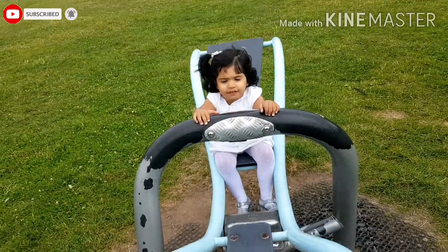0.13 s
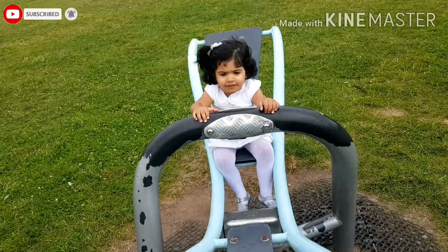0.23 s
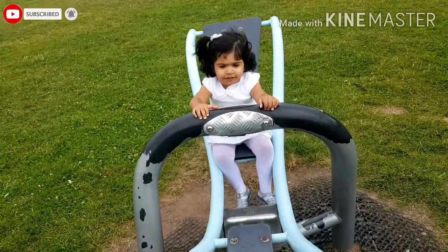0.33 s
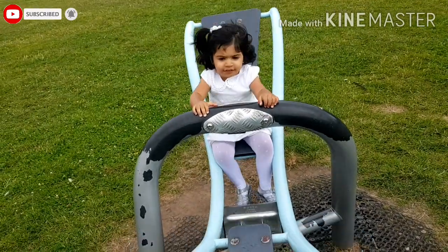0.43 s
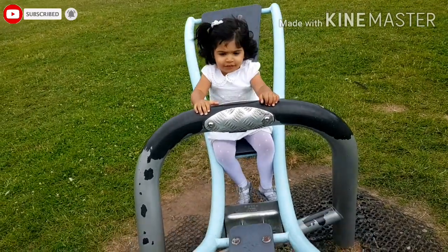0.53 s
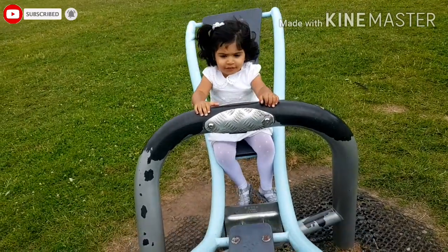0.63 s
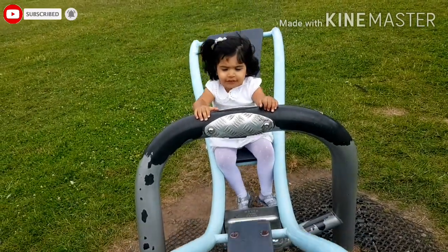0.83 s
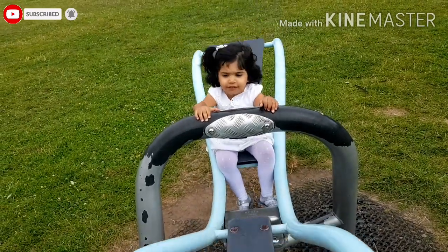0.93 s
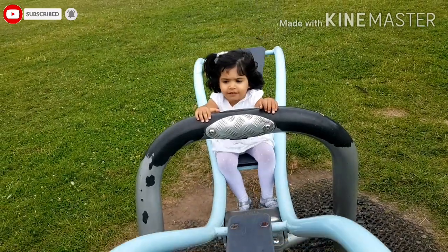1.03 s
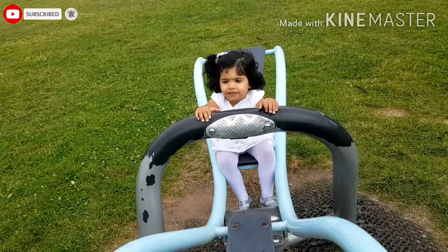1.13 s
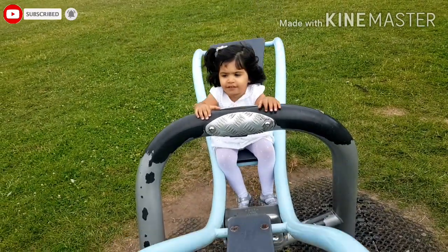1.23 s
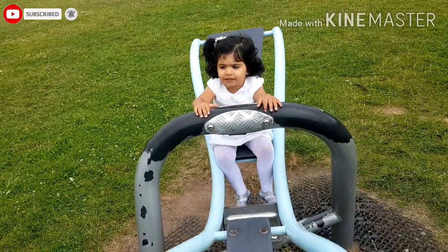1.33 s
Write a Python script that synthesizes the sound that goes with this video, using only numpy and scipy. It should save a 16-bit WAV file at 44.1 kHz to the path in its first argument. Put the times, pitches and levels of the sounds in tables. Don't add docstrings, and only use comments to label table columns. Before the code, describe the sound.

A dry metal pivot squeaks sharply, then rasps back more roughly, over soft outdoor wind buffeting

```python
import sys
import numpy as np
from scipy import signal
from scipy.fft import rfft, irfft
from scipy.io import wavfile
from scipy.ndimage import uniform_filter1d

SR = 44100
rng = np.random.default_rng(int(sys.argv[2]) if len(sys.argv) > 2 else 0)


def inscribe(sig):
    pcm = np.round(np.clip(np.atleast_2d(sig).T, -1, 1) * 32767)
    wavfile.write(sys.argv[1], SR, pcm.astype(np.int16))


def to_linear_factor(level_db):
    exponent = np.asarray(level_db, float) / 20
    return 10 ** exponent


N = 61740
TOP_HZ = 15450


def curve(t, rows, col=1, off=-130.):
    r = np.array(rows)
    if off:
        return np.interp(t, r[:, 0], r[:, col], off, off)
    return np.interp(t, r[:, 0], r[:, col])


def on_log(hz, rows, col=1):
    r = np.array(rows)
    return np.interp(np.log(np.maximum(hz, 1)), np.log(r[:, 0]), r[:, col])


def unit(x):
    return x / np.sqrt(np.mean(x ** 2))


def colour(x, rows):
    hz = np.arange(N // 2 + 1) * SR / N
    return irfft(rfft(x) * to_linear_factor(on_log(hz, rows)), N)


def walk(rate):
    k = int(SR / rate)
    held = np.repeat(rng.standard_normal(N // k + 1), k)
    return 1.3 * uniform_filter1d(uniform_filter1d(held, k), k)[:N]


def mode(x, hz, width):
    return signal.lfilter(*signal.iirpeak(hz, hz / width, SR), x)


# (f/Hz, left lead/rad, left minus right level/dB)
PORTS = [(1302, 0.47, 1.6), (2450, 0.6, 1.5), (3750, 1.33, -1.5), (4016, 1.3, 4), (4800, -0.56, -8.5),
         (6300, -1.3, -0.5), (12000, 1.3, -4.5)]


def squeal(hz, gain):
    wobble_hz = 18
    out, on = np.zeros((2, N)), gain > 1e-6
    side = np.array([[.5], [-.5]])
    phase = (2 * np.pi * np.cumsum(hz + wobble_hz * walk(120)) / SR)[on]
    lag = side * on_log(hz[on], PORTS)
    size = np.sqrt(2) * gain[on] * to_linear_factor(side * on_log(hz[on], PORTS, col=2))
    overtone = to_linear_factor(-31) * (hz.max() < TOP_HZ / 3)
    wave = np.sin(phase + lag)
    for k in (2, 3):
        wave = wave + overtone * np.sin(k * phase + lag)
    out[:, on] = size * wave
    return out


# (t/s, f/Hz, level/dB)
LEAD = [
    [(0.218, 3984, -64), (0.232, 3786, -48.5), (0.25, 3881, -34.5), (0.318, 3801, -27.5),
     (0.329, 3797, -32)],
    [(0.329, 3944, -30), (0.339, 3870, -40.5), (0.349, 3810, -31.5), (0.375, 3884, -38.5),
     (0.381, 3814, -41.5), (0.391, 3785, -41.5), (0.397, 3925, -50.5), (0.4, 4013, -41)],
    [(0.393, 3834, -49.5), (0.397, 4010, -53), (0.403, 4028, -33), (0.421, 4068, -26.5),
     (0.449, 3998, -32.5), (0.479, 4133, -51.5), (0.5, 4200, -76)],
    [(0.925, 3802, -58.5), (0.939, 4093, -36.5), (0.955, 4039, -29.5), (0.965, 4070, -34),
     (0.973, 4200, -55.5), (1.0, 4220, -72.5)],
]


def leading_squeal(t):
    out = 0
    for rows in LEAD:
        gain = uniform_filter1d(to_linear_factor(curve(t, rows, col=2)), size=150)
        out = out + squeal(curve(t, rows, off=0), gain * to_linear_factor(.6 * walk(130)))
    return out


SPELLS_OUT = [(.219, .045, 2540, -55), (.228, .025, 4850, -52), (.265, .065, 2330, -51),
              (.272, .02, 1615, -52), (.235, .095, 1440, -58), (.222, .045, 6230, -55),
              (.268, .058, 6210, -51), (.27, .03, 4530, -52), (.33, .035, 4385, -47),
              (.33, .045, 5550, -50), (.33, .04, 6460, -53), (.345, .05, 2420, -51), (.375, .1, 1380, -56),
              (.42, .04, 1740, -59), (.40, .045, 5410, -57), (.26, .05, 5480, -53), (.41, .05, 2320, -63),
              (.25, .11, 990, -64)]
SPELLS_BACK = [(.75, .038, 2356, -44), (.752, .024, 4705, -52), (.765, .03, 1065, -61),
               (.78, .038, 2505, -47), (.798, .025, 5383, -47), (.80, .045, 838, -60),
               (.822, .02, 2348, -49), (.823, .018, 3935, -48), (.841, .027, 3857, -41),
               (.861, .013, 4442, -51), (.742, .016, 3990, -59), (.885, .052, 2395, -45),
               (.883, .03, 2660, -50), (.89, .048, 3740, -50), (.895, .03, 1076, -56),
               (.888, .055, 4530, -51), (.886, .025, 4780, -51), (.925, .05, 1400, -51),
               (.935, .055, 1768, -51), (.933, .037, 5850, -43), (.805, .025, 4905, -54),
               (.752, .065, 3702, -56), (.745, .1, 6172, -59), (.79, .045, 1610, -58),
               (.795, .045, 3220, -56), (.84, .02, 1470, -57), (.885, .035, 1430, -57),
               (.89, .05, 6340, -56), (.94, .035, 2710, -56), (.935, .04, 12290, -53)]
SPELLS_NEXT = [
    (1.358, .05, 2538, -53),
    (1.362, .05, 3725, -50),
    (1.362, .04, 4984, -56),
    (1.36, .05, 6185, -55),
    (1.365, .02, 2440, -55),
]
# upper modes of the tube, and near 8.1 and 12.2 kHz overtones of the leading squeal (start
# t/s, length t/s, f/Hz, level/dB),
SPELLS_HIGH = [(.24, .03, 11530, -66), (.27, .05, 10170, -63), (.27, .025, 9250, -64),
               (.295, .03, 7645, -61), (.325, .03, 10410, -56), (.325, .025, 9740, -61),
               (.3, .09, 12280, -64), (.39, .025, 7340, -65), (.39, .08, 8060, -62), (.415, .03, 9840, -60),
               (.41, .035, 10440, -61), (.42, .07, 12210, -67), (.80, .03, 9900, -63),
               (.81, .04, 12300, -65), (.94, .035, 8170, -56), (.945, .027, 9980, -58),
               (.955, .017, 10700, -63), (.94, .02, 15400, -68), (1.365, .04, 9900, -68),
               (1.375, .03, 12300, -72)]
# (start t/s, length t/s, f/Hz, level/dB)
SETTLE = [(0, .04, 4080, -86), (0, .03, 1943, -80), (0, .03, 1570, -81), (.07, .05, 4080, -91),
          (.62, .028, 4060, -80), (.49, .13, 4090, -88), (.65, .09, 4070, -92), (1.09, .08, 4100, -92),
          (.99, .055, 4100, -79), (1.04, .06, 4100, -82), (.99, .04, 8170, -80), (1.16, .12, 4100, -93),
          (1.272, .045, 4100, -88)]
# (f/Hz, ring t/s)
RING_S = [(800, .05), (1400, .08), (1770, .1), (2400, .04), (4000, .03), (7000, .02)]


def side_modes(t):
    attack_s, flutter_db = .011, 2.5
    out = 0
    for start, length, hz, db in SPELLS_OUT + SPELLS_BACK + SPELLS_NEXT + SPELLS_HIGH + SETTLE:
        u = t - start
        grow = np.clip(u / attack_s, 0, 1) ** 2
        ring_down = to_linear_factor(-60 * np.clip(u - length, 0, 1) / on_log(hz, RING_S))
        out = out + squeal(hz + 0 * t, grow * ring_down * to_linear_factor(db + flutter_db * walk(150)))
    return out


# (t/s, squeal dip level/dB, grit spit level/dB)
SLIPS = [(.242, -8, 2), (.274, -9, 6), (.289, -8, 6), (.3285, -22, 4), (.336, -14, 8), (.341, -10, 8),
         (.352, -5, 5), (.366, -16, 3), (.426, -4, 2), (.787, -6, 3), (.806, -2, 6), (.827, -4, 8),
         (.8545, -12, 4), (.87, -8, 2), (.899, -2, 6), (1.38, -8, 4), (1.394, -8, 5)]


def slips(t):
    slip_s = .0016
    dip, spit = 0, 0
    for s, dip_db, spit_db in SLIPS:
        dip = dip + dip_db * np.exp(-((t - s - .001) / slip_s) ** 2)
        spit = spit + spit_db * np.exp(-((t - s - .002) / slip_s) ** 2)
    return dip, spit


# (t/s, level/dB)
DRAG = [
    [(.217, -76.5), (.235, -61.5), (.27, -56), (.34, -54), (.38, -57.5), (.42, -58.5), (.468, -68.5),
     (.485, -76.5), (.52, -91)],
    [(.748, -72.5), (.765, -74.5), (.8, -56.5), (.86, -57), (.878, -63.5), (.892, -59), (.968, -54),
     (.978, -65), (1.02, -86)],
    [(1.356, -79), (1.366, -74), (1.4, -61.5)],
]


def pivot_drag(t, spit):
    drag = uniform_filter1d(sum(to_linear_factor(curve(t, rows)) for rows in DRAG), size=100)
    return drag * to_linear_factor(.5 * spit + 1.2 * walk(250))


# (f/Hz, level/dB)
TONE_DIPS = [(6600, 0), (7000, -9), (7600, 0), (8500, -10), (9300, 0), (12600, 0), (13000, -8), (13600, 0)]


def patchy(x, patches):
    out = 0
    for hz, drift in patches:
        band = mode(mode(x, hz, hz / 14), hz, hz / 14)
        out = out + band * to_linear_factor(7 * np.clip(drift, -3, .3) + on_log(hz, TONE_DIPS))
    return unit(out)


# (f/Hz, level/dB)
CHATTER = [(600, -19.5), (1500, -13), (4000, -2), (6300, -2), (7000, -13), (10000, -11), (13000, -18),
           (15500, -18.5)]


def bush_chatter(lead, sides, drag, patches):
    gap, lead_share, level_db = 1, .32, 7
    shake = sides[0] + lead_share * lead[0]
    shake = shake / np.sqrt(uniform_filter1d(shake ** 2, size=300) + 1e-9)
    strikes = np.clip(shake - gap, 0, 1) ** 2
    chatter = patchy(colour(strikes, CHATTER), patches)
    return to_linear_factor(level_db) * drag * np.array([chatter, np.roll(chatter, shift=2)])


# (f/Hz, level/dB per Hz)
GRIT = [(500, -35), (900, -4.5), (2400, -13.5), (4200, 0), (6400, -12.5), (7100, -15), (10500, -9.5),
        (15500, -28)]
# (f/Hz, width f/Hz, level/dB)
FRAME = [(1375, 9.7, -34), (1800, 26, -33), (2404, 79, -8.5), (3750, 44, -8.5), (3927, 39, -11),
         (4570, 80, -9.5), (5460, 290, -21), (6050, 45, -27.5), (6270, 150, -16.5)]
# (t/s, level/dB)
TICKS = [
    (0.475, -57.5),
    (0.553, -66.5),
]


def grit_and_frame(t, drag, patches, shared):
    grit_db, rattle_db, grain_db = 6, 8.5, 3
    ticks = sum(to_linear_factor(db) * np.exp(-np.abs(t - s) / .0024) for s, db in TICKS)
    out = np.zeros((2, N))
    for ch in range(2):
        noise = np.roll(shared, shift=ch) + 2.2 * rng.standard_normal(N)
        grains = unit(noise * to_linear_factor(grain_db * rng.exponential(size=N)))
        rattle = sum(to_linear_factor(db) * mode(mode(grains, hz, w), hz, 2 * w) for hz, w, db in FRAME)
        grit = patchy(colour(grains, GRIT), patches)
        out[ch] = (to_linear_factor(grit_db) * drag + ticks) * grit + to_linear_factor(rattle_db) * drag * unit(rattle)
    return out


# (f/Hz, level/dB, 60 dB decay t/s)
AFTER = [(4105, -49, .9), (2370, -49, .6)]


def after_ring(drag):
    push = drag * rng.standard_normal(N)
    ring = 0
    for hz, db, decay_s in AFTER:
        width = np.log(1000) / (np.pi * decay_s)
        ring = ring + to_linear_factor(db + 64.5 + 1.1 * walk(40)) * mode(push, hz, width)
    return np.array([ring, np.roll(ring, shift=2)])


def pivot(t):
    dip, spit = slips(t)
    lead = leading_squeal(t) * to_linear_factor(dip)
    sides = side_modes(t) * to_linear_factor(dip * (t > .7))
    drag = pivot_drag(t, spit)
    patches = [(hz, walk(40)) for hz in 600 * 2 ** np.arange(0, 4.7, 1 / 11)]
    chatter = bush_chatter(lead, sides, drag, patches)
    shared = rng.standard_normal(N)
    ring = after_ring(drag)
    return lead + sides + chatter + ring + grit_and_frame(t, drag, patches, shared)


# (t/s, level/dB)
GUST = [(0, -57), (.06, -67), (.13, -73), (.18, -60.5), (.24, -69.5), (.33, -62), (.40, -66.5),
        (.45, -65.5), (.58, -68), (.65, -80), (.76, -72), (.95, -73), (1.1, -78), (1.14, -67),
        (1.22, -88.5), (1.29, -76.5), (1.34, -60), (1.4, -58.5)]
# (t/s, lift level/dB)
BUMPS = [
    (.17, 2.5),
    (0.327, 8),
    (0.604, 9.5),
    (0.889, 2.5),
    (1.044, 7.5),
    (1.09, 8),
    (1.13, 0.5),
    (1.34, 3),
]
# (f/Hz, level/dB per Hz)
WIND = [(28, -20.5), (60, -0.5), (120, -5.5), (400, -12), (900, -17.5), (1300, -35.5), (3000, -51.5)]


def wind(t):
    wind_db, gust_mid_db, buffet_db, bump_s = -57.5, -70, 2.5, .016
    out, gust = np.zeros((2, N)), curve(t, GUST, off=0) - gust_mid_db
    thump = [walk(32), walk(35)]
    bumps = sum(db * np.exp(-((t - s) / bump_s) ** 2) for s, db in BUMPS)
    for hz in 28 * 2 ** np.arange(0, 6.6, .5):
        follow = np.interp(np.log(hz), np.log([60, 300]), [.16, .92])
        lean = np.interp(np.log(hz), np.log([150, 400]), [5.5, -1.5])
        for ch in range(2):
            band = mode(mode(rng.standard_normal(N), hz, hz / 2), hz, hz / 2)
            level = on_log(hz, WIND) + follow * gust + lean * (1.0 - ch)
            level = level + buffet_db * thump[ch] + bumps * (hz < 250) + 3.4 * walk(30)
            out[ch] += band * to_linear_factor(level)
    return unit(out) * to_linear_factor(wind_db)


# (f/Hz, level/dB per Hz)
HISS = [(900, -16), (1500, -4.5), (3300, -8), (15500, -16)]


def park_hiss():
    return to_linear_factor(-78.5) * np.array([unit(colour(rng.standard_normal(N), HISS)) for _ in range(2)])


def scene():
    t = np.arange(N) / SR
    hiss = park_hiss()
    return pivot(t) + wind(t) + hiss


def top_cut(x):
    return signal.sosfilt(signal.butter(12, 15630, fs=SR, output="sos"), x)


def record(dry):
    low_pass = signal.ellip(10, .2, 70, TOP_HZ, fs=SR, output="sos")
    mix = signal.sosfilt(low_pass, dry)
    return top_cut(mix)


dry = scene()
out = record(dry)
inscribe(out)
```